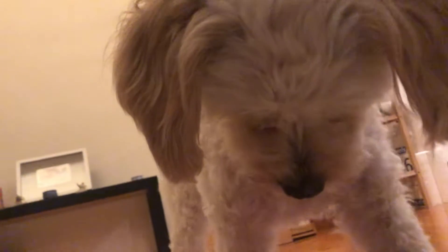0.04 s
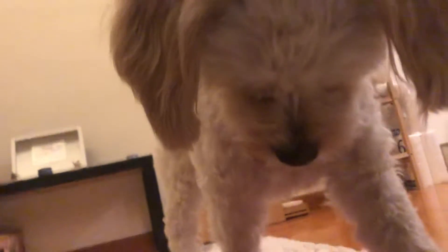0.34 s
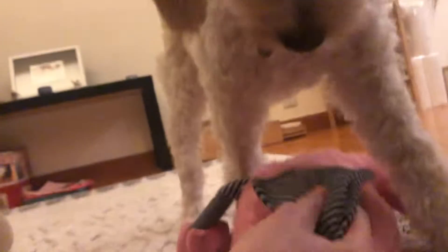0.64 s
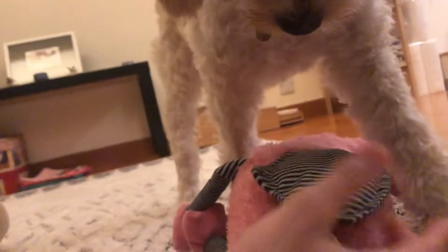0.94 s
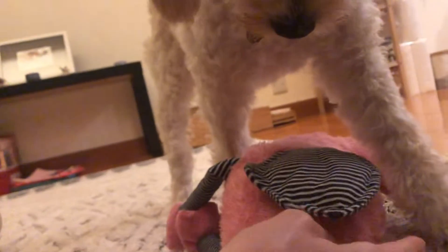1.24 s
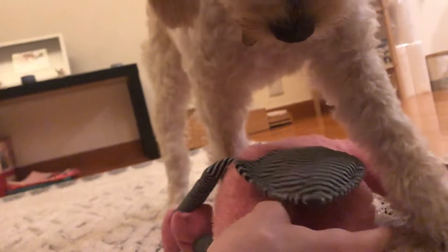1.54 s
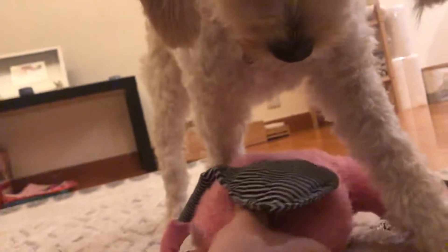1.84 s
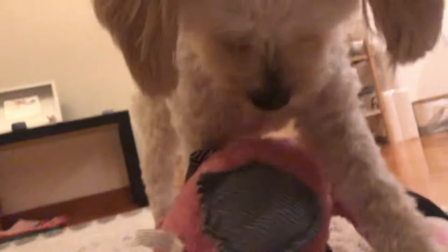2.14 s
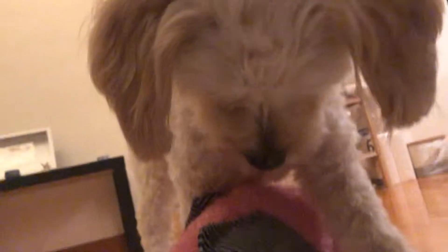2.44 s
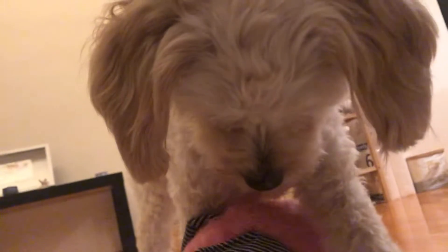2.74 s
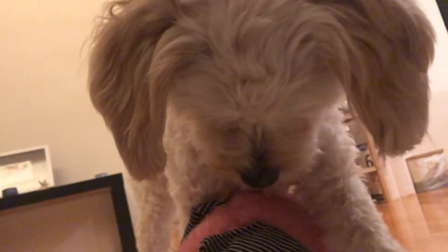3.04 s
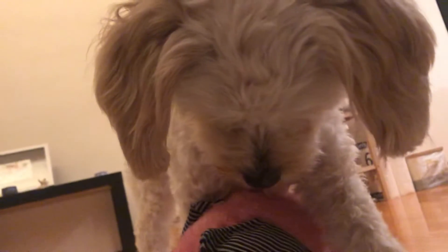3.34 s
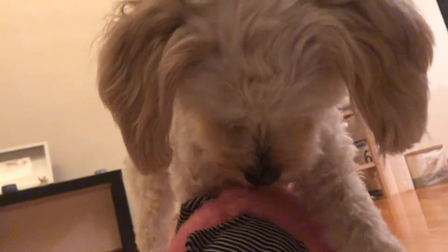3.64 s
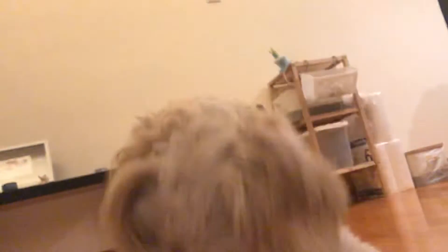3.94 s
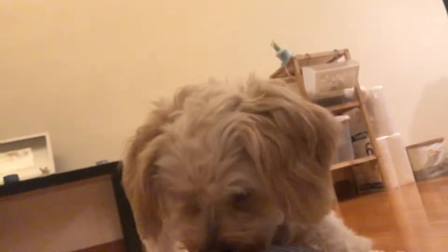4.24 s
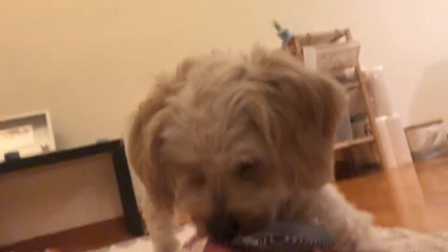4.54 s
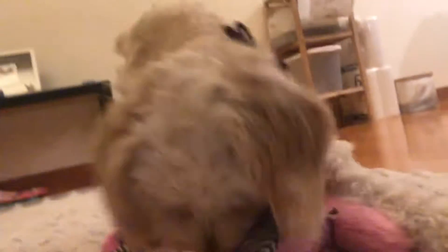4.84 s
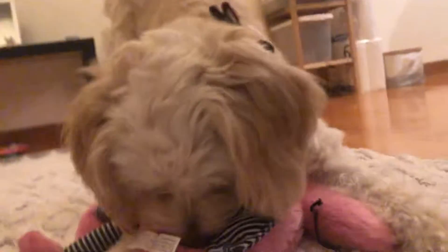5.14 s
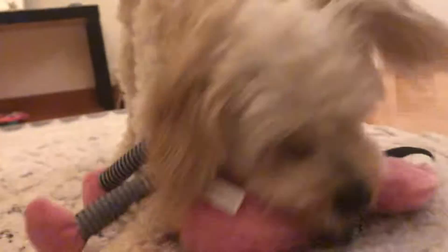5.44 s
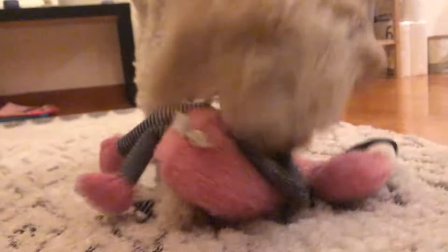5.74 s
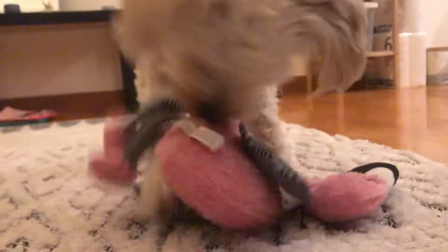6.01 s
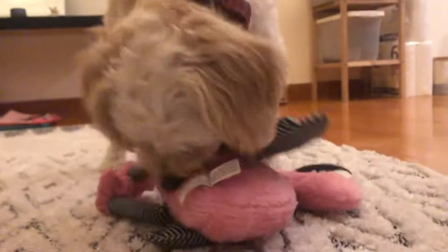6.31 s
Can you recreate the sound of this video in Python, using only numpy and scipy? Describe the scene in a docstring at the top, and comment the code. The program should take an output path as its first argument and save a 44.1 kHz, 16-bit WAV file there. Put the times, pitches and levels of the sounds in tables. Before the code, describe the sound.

A dog noses and bites a plush toy, giving three short high squeaks amid close cloth rustling, crackles and dull thumps.

```python
"""A plush toy's reed squeaks three times as a dog noses and bites it on a rug, close to the microphone.
The reed chops air into pulses that ring a short pipe: bite, refill, bite; later a leak whistles faintly.
The cloth crackles and rustles, the toy bumps on the rug, and the dog sniffs once.
Farther off, friction strokes scuff and drum the wooden floor and fill the live room."""
import sys
import numpy as np
from scipy import signal
from scipy.fft import rfft, irfft
from scipy.io import wavfile
from scipy.ndimage import uniform_filter1d

SR = 44100
rng = np.random.default_rng(int(sys.argv[2]) if len(sys.argv) > 2 else 0)


def int16_out(signal):
    """Quantize to a 16-bit WAV file."""
    q = np.round(np.clip(np.atleast_2d(signal).T, -1, 1) * 32767)
    wavfile.write(sys.argv[1], SR, q.astype(np.int16))


N = 285326
TIME = np.arange(N) / SR

# rubs of fur and plush: start_s, length_s, level_db, snap_peak_db
RUB_STROKES = [(0, .1, -56, -26), (.1, .085, -50, -24), (.27, .03, -44, -29), (.428, .055, -45, -22),
               (.52, .05, -55, -27), (.57, .11, -48, -26), (.7, .09, -50, -29), (.82, .06, -59, -29),
               (3.655, .04, -63, -52), (3.8, .18, -40.5, -33), (3.98, .07, -52, -40),
               (5.345, .07, -48.5, -36), (5.46, .05, -58, -37), (5.545, .14, -46.5, -32),
               (5.69, .08, -44, -30), (5.78, .07, -53, -31), (5.85, .18, -54, -40), (6.03, .11, -50, -30),
               (6.17, .03, -42, -29), (6.22, .23, -62, -44)]


def amp(db):
    """Decibels to gain."""
    return 10 ** (np.asarray(db) / 20)


def unit(x):
    """Scale to rms 1."""
    return x / np.sqrt(np.mean(x ** 2) + 1e-20)


def read(points, hz):
    """Curve value at hz, interpolated in log frequency."""
    freq_hz, value = np.transpose(points)
    return np.interp(np.log(hz + 1), np.log(freq_hz), value)


def add(mix, start_s, sound):
    """Mix a sound in at start_s."""
    part = mix[max(round(start_s * SR), 0):][:len(sound)]
    part += sound[:len(part)]


def coloured(x, spectrum, tilt_db_per_oct=0):
    """Filter by a spectrum tilted about 500 Hz; rms 1."""
    hz = np.fft.rfftfreq(len(x), 1 / SR)
    gain_db = read(spectrum, hz) + tilt_db_per_oct * np.log2(hz / 500 + .1)
    return unit(irfft(rfft(x) * amp(gain_db), len(x)))


def minimum_phase(gain_db):
    """Sharpest causal impulse response with this spectrum."""
    cepstrum = irfft(np.log(amp(gain_db)))
    half = len(cepstrum) // 2
    cepstrum[1:half] *= 2
    cepstrum[half + 1:] = 0
    return irfft(np.exp(rfft(cepstrum)))


def drift(samples, window):
    """Noise smoothed twice over window samples; rms 1."""
    return unit(uniform_filter1d(uniform_filter1d(rng.standard_normal(samples), window), window))


def strokes(rows, attack_s, release_s):
    """Envelope of strokes that swell, hold and die away."""
    gain = np.zeros(N)
    for start_s, length_s, level_db, *_ in rows:
        rise = np.clip((TIME - start_s) / attack_s, 0, 1)
        fall = np.exp(-np.maximum(TIME - start_s - length_s, 0) / release_s)
        gain = np.maximum(gain, amp(level_db) * rise * fall)
    return gain


def ring(peak_db, hz, decay_s):
    """One mode swells and dies."""
    t = TIME[:SR]
    return amp(peak_db) * t / decay_s * np.exp(1 - t / decay_s) * np.sin(2 * np.pi * hz * t)


def room_tone(rms_db=-59):
    """Faint, steady noise of the still room."""
    # noise spectrum: freq_hz, gain_db
    spectrum = [(12, -35), (20, -5.5), (152, -6.5), (208, -6), (239, -15.5), (308, -6.5), (397, -18),
                (498, -18), (739, -21), (953, -20), (2480, -29.5), (15100, -40), (16900, -66)]
    return amp(rms_db) * coloured(rng.standard_normal(N), spectrum)


def room(x, gap_s=0.0043):
    """Dense reflections; the treble dies first."""
    # reverberation time: freq_hz, t60_s
    decay = [(100, 0.72), (400, 0.68), (1100, 0.53), (4000, 0.51), (8000, 0.39), (15000, 0.33)]
    taps = rng.standard_normal(SR) * np.clip(TIME[:SR] / gap_s - 1, 0, 1)
    hz, t, bands = signal.stft(taps, SR, nperseg=256)
    tail = signal.istft(bands * amp(-60 * t / read(decay, hz)[:, None]), SR, nperseg=256)[1]
    return signal.fftconvolve(x, tail / np.linalg.norm(tail))[:N]


def floor_drum(force):
    """The floor's modes ring on after the driving force."""
    # floor modes: freq_hz, width_hz, level_db
    modes = [(112, 6.4, -3), (207.2, 11, -5), (275, 16, -9), (319.1, 12, 0.5), (357, 24, 1), (456.4, 22, 2),
             (488, 14, -11.5)]
    t = TIME[:SR // 2]
    response = sum(amp(db) * np.sqrt(width_hz) * np.exp(-np.pi * width_hz * t)
                   * np.sin(2 * np.pi * hz * t) for hz, width_hz, db in modes)
    return signal.fftconvolve(force, response / np.linalg.norm(response))[:len(force)]


def scuffs(uneven_db=2.0, direct_db=-3, room_db=-3, drum_db=-2):
    """Distant friction strokes with their echo; each has its own brightness, and heavier ones drum."""
    # scuffs: start_s, level_db, rise_s, hold_s, fade_s, tilt_db_per_oct, heavy_db
    rows = [(0.632, -41.5, 0.072, 0.013, 0.058, -0.5, -3.5), (1.865, -36.5, 0.006, 0.018, 0.028, 0.7, 6),
            (2.278, -31.5, 0.012, 0.015, 0.047, -1.03, -2.5), (2.554, -35, 0.005, 0.0096, 0.035, -0.76, 1),
            (2.688, -36.5, 0.044, 0.021, 0.066, -0.6, -1.5), (3.058, -36, 0.1, 0.069, 0.045, -1.1, 2),
            (4.25, -43, 0.0068, 0.013, 0.038, -0.5, -0.5), (4.31, -31.5, 0.047, 0.12, 0.068, 0.6, -12.5),
            (4.628, -39.5, 0.013, 0.035, 0.063, -0.7, -9), (4.928, -48.5, 0.013, 0.013, 0.15, -1, -4.5)]
    # friction spectrum: freq_hz, gain_db
    spectrum = [(40, -42), (85, -14), (130, -1), (250, -1), (320, -9), (460, -2), (600, -12), (880, -5),
                (1400, -6.5), (2000, -11.5), (3600, -14), (6000, -24.5), (10000, -35), (16000, -60)]
    hiss, shove, t = np.zeros(N), np.zeros(N), TIME[:SR]
    for start_s, level_db, rise_s, hold_s, fade_s, tilt_db_per_oct, heavy_db in rows:
        rise = np.minimum(t / rise_s, 1) ** 2
        fall = np.exp(-np.maximum(t - rise_s - hold_s, 0) / fade_s)
        grip = amp(uneven_db * drift(SR, window=250))  # catches and slips
        push = amp(level_db) * rise * fall * grip
        add(hiss, start_s, push * coloured(rng.standard_normal(SR), spectrum, tilt_db_per_oct))
        add(shove, start_s, push * amp(heavy_db) * rng.standard_normal(SR))
    direct = hiss + amp(drum_db) * floor_drum(shove)
    return amp(direct_db) * direct + amp(room_db) * room(direct)


def sniff(start_s=5.04, length_s=.22, level_db=-51):
    """Air drawn through a nose pressed into plush: a rush with one hollow resonance."""
    # breath spectrum: freq_hz, gain_db
    spectrum = [(200, -25), (550, -14), (1000, -12), (1550, -11), (1750, 0), (2000, -11), (2600, -22),
                (8000, -34)]
    breath = strokes([(start_s, length_s, level_db)], attack_s=.15, release_s=.08)
    return breath * coloured(rng.standard_normal(N), spectrum)


def bumps(rumble_db=-3):
    """Dull rumble of the shifting toy, low booms and one hard tap."""
    # pushes on the toy: start_s, length_s, level_db
    pushes = [(.015, .13, -46.5), (.25, .15, -54), (.415, .06, -37), (.52, .17, -42.5), (.68, .17, -33),
              (.86, .14, -39), (1.72, .05, -51), (3.845, .11, -38.5), (4.03, .1, -51), (4.8, .27, -52),
              (5.68, .04, -56), (5.89, .04, -51), (6.03, .2, -55)]
    # rumble spectrum: freq_hz, gain_db
    spectrum = [(25, -36), (45, -22), (80, -1), (130, 2), (170, -3.5), (260, -4.5), (360, -12), (550, -26),
                (1200, -35), (4000, -54)]
    # floor and room modes: start_s, peak_db, freq_hz, decay_s
    booms = [(0.426, -31, 127.6, 0.021), (.5, -39.5, 125.5, 0.062), (0.734, -36.5, 81, 0.045),
             (.815, -33.5, 79.2, .045), (1.03, -43.5, 124.7, .07), (3.16, -37, 109, .032),
             (4.38, -39, 146, .05), (4.51, -37, 130, .03)]
    handling = amp(rumble_db) * strokes(pushes, attack_s=.022, release_s=.075)
    out = handling * coloured(rng.standard_normal(N), spectrum)
    for start_s, peak_db, hz, decay_s in booms:
        add(out, start_s, ring(peak_db, hz, decay_s))
    add(out, .1781, ring(peak_db=-26.5, hz=2070, decay_s=.0011))  # tap
    return out


def pats(fall=1.45, lowest_hz=65, blur_rad=0.75):
    """Soft blows: treble arrives first, bass trails; the rug's pile blurs the sweep."""
    # pats on the rug: start_s, peak_db, start_hz, rise_s
    blows = [(3.846, -29, 136, 0.017), (5.703, -35, 1800, 0.0028), (5.741, -32.5, 1790, 0.0024),
             (5.904, -36, 1054, 0.0046), (5.91, -36, 264, 0.0065), (6.065, -34, 1780, 0.00216),
             (6.116, -37, 780, 0.0041), (6.139, -39, 990, 0.0029), (6.157, -40, 130, 0.011),
             (6.177, -36, 2200, 0.0065)]
    out, t = np.zeros(N), TIME[:SR // 4]
    for start_s, peak_db, start_hz, rise_s in blows:
        age = t / rise_s
        pitch_hz = lowest_hz + (start_hz - lowest_hz) / (1 + fall * age)
        phase = 2 * np.pi * np.cumsum(pitch_hz) / SR
        phase += blur_rad * drift(len(t), window=round(SR / start_hz))
        add(out, start_s, amp(peak_db) * age * np.exp(1 - age) * np.sin(phase))
    return out


def rustle(grains_per_s=700, spread_db=7.5, hiss_gain=.9, clump_db=2, gain_db=-1):
    """Fibres slip in clumps of uneven grains over a brushing hiss."""
    # plush spectrum: freq_hz, gain_db
    spectrum = [(150, -8.5), (500, 3), (900, 8.5), (1800, 4.5), (3000, 3), (6000, 0.5), (10000, -0.5),
                (13000, -10), (16000, -21.5)]
    sizes = amp(spread_db * np.minimum(rng.exponential(1, N), 4)) * rng.choice([-1, 1], N)
    grains = unit(sizes * (rng.random(N) < grains_per_s / SR))
    rubbing = (grains + hiss_gain * rng.standard_normal(N)) * amp(clump_db * drift(N, window=150))
    envelope = amp(gain_db) * strokes(RUB_STROKES, attack_s=.014, release_s=.018)
    return envelope * coloured(rubbing, spectrum)


def thread_slips(slips_per_s=58, centre_hz=4500, spread_db=2.5, spread_oct=.5):
    """Threads catch and let go unevenly during each rub. Rows: start_s, peak_db, centre_hz."""
    rows = []
    for start_s, length_s, _, peak_db in RUB_STROKES:
        slips_s = (np.arange(32) + rng.random(32)) / slips_per_s
        force, pitch = np.clip(rng.standard_normal((2, 32)), -2, 2)
        slip_hz = centre_hz * 2 ** (spread_oct * pitch)
        crackle = np.c_[start_s + slips_s, peak_db + spread_db * force, slip_hz]
        rows += list(crackle[slips_s < length_s])
    return rows


def snaps(skirt_db_per_oct=8, grit=0.33, decay_cycles=2.15, min_decay_s=0.00031):
    """A sharp release, then a brief scatter of fibres; dull snaps last longer."""
    # loud snaps of cloth, claws and teeth: start_s, peak_db, centre_hz
    loud = [(0.0347, -22, 3900), (0.0527, -16.5, 5300), (0.107, -17, 9800), (0.1144, -12.5, 6100),
            (0.125, -18, 8900), (0.1472, -9, 9000), (0.1605, -10, 4940), (0.1782, -14, 2250),
            (0.267, -20, 6500), (0.279, -18, 6800), (0.2993, -20, 8900), (0.3164, -18.5, 3530),
            (0.4364, -17, 4500), (0.4399, -21, 2970), (0.4686, -20.5, 4280), (0.5891, -21, 2800),
            (0.6544, -19.5, 3900), (0.7478, -15, 8700), (0.7838, -22.5, 2600), (0.7905, -20, 3800),
            (0.8822, -19, 6350), (1.059, -33.5, 3730), (1.6989, -18, 8100), (2.0074, -16.5, 4800),
            (2.1366, -31, 5700), (3.8146, -22.5, 6700), (3.9511, -19, 7500), (3.9986, -23.5, 3250),
            (4.0567, -27, 4650), (4.2077, -37, 3600), (4.28, -33.5, 4700), (4.31, -25.5, 4900),
            (4.654, -26, 4100), (4.7455, -16, 5600), (4.7863, -20.5, 5200), (4.8246, -22.5, 4160),
            (5.5348, -21.5, 5340), (5.5623, -14.5, 5100), (5.7058, -19.5, 4800), (5.7368, -21.5, 7250),
            (5.8505, -25, 7900), (6.0785, -22, 7600), (6.1312, -22.5, 4500), (6.177, -25, 6100),
            (6.2164, -23, 9600), (6.4136, -31, 7100)]
    # snap spectrum: freq_hz, gain_db
    spectrum = [(100, -18.5), (500, 9.5), (1000, 7), (2100, 8.5), (3100, 1.5), (4700, 2.5), (8000, 1),
                (12000, 1), (16000, -13)]
    out, t, hz = np.zeros(N), TIME[:512], np.fft.rfftfreq(512, 1 / SR)
    for start_s, peak_db, centre_hz in list(loud) + thread_slips():
        decay_s = min_decay_s + decay_cycles / centre_hz
        force = grit * rng.standard_normal(len(t)) * np.exp(-t / decay_s)
        force[0] = 1  # release
        octaves = np.log2((hz + 100) / centre_hz)
        skirt_db = skirt_db_per_oct * (np.sqrt(1 + octaves ** 2) - 1)
        snap = signal.fftconvolve(force, minimum_phase(read(spectrum, hz) - skirt_db))
        add(out, start_s, amp(peak_db) * snap / abs(snap).max())
    return out


def whistle(waver=.002):
    """Too little air to swing the reed: a thin tone with two stray overtones."""
    # leak through the reed: time_s, pitch_hz, level_db
    leak = [(5.855, 7700, -68), (5.87, 7600, -55), (5.89, 7600, -63), (5.905, 7560, -43),
            (5.922, 7580, -49), (5.94, 7550, -55), (5.96, 7450, -72)]
    # whistle partials: pitch_ratio, level_db
    partials = [(1, 0), (1.647, -17), (1.808, -17)]
    time_s, pitch_hz, level_db = np.transpose(leak)
    cycles = np.cumsum(np.interp(TIME, time_s, pitch_hz) * (1 + waver * drift(N, window=80))) / SR
    tone = unit(sum(amp(db) * np.sin(2 * np.pi * ratio * cycles) for ratio, db in partials))
    gain = amp(np.interp(TIME, time_s, level_db, left=-np.inf, right=-np.inf))
    return uniform_filter1d(gain, size=400) * tone


def squeak(curve, pipe, jitter, air_db, slack_db_per_db=0.55, release_s=.005):
    """A reed chops air into pulses that ring a short pipe. Returns start_s, sound."""
    time_s, hz, db = np.transpose(curve)
    t = np.arange(time_s[0], time_s[-1], 1 / SR)
    level_db = np.interp(t, time_s, db)
    # a weakly blown reed is less steady
    flutter = jitter * amp(slack_db_per_db * np.minimum(db.max() - level_db, 20))
    pitch_hz = np.interp(t, time_s, hz) * (1 + flutter * drift(len(t), window=40))
    phase = 2 * np.pi * np.cumsum(pitch_hz) / SR
    grid_hz = np.fft.rfftfreq(2048, 1 / SR)
    pipe_phase = np.unwrap(np.angle(rfft(minimum_phase(read(pipe, grid_hz)))))
    tone = np.zeros(len(t))
    for k in range(1, 15):
        shift = np.interp(k * pitch_hz, grid_hz, pipe_phase)
        tone -= amp(read(pipe, k * pitch_hz)) * np.cos(k * phase + shift)
    air = coloured(rng.standard_normal(len(t)) * (1 + np.cos(phase)), pipe)
    closing = np.minimum((time_s[-1] - t) / release_s, 1)
    return time_s[0], closing * amp(level_db) * (unit(tone) + amp(air_db) * air)


def squeaker():
    """Two bites, the bulb drawing air just before the second; then the leak."""
    # reed curves: time_s, pitch_hz, level_db
    first_bite = [(2.873, 1060, -50), (2.8755, 1078, -20), (2.884, 1077, -19.5), (2.898, 1042, -20),
                  (2.9031, 975, -26.5), (2.9091, 875, -33), (2.9151, 815, -49)]
    refill = [(3.688, 1192, -69), (3.698, 1204, -32), (3.704, 1163, -23.5), (3.714, 1188, -25.5),
              (3.723, 1160, -24.5), (3.735, 1178, -29.5), (3.749, 1230, -22.5), (3.76, 1207, -26),
              (3.769, 1205, -32)]
    second_bite = [(3.847, 1010, -37), (3.851, 1046, -20), (3.865, 1072, -20), (3.88, 1139, -18),
                   (3.885, 1066, -25), (3.895, 1049, -17.5), (3.906, 1018, -31.5), (3.915, 1018, -26.5),
                   (3.923, 933, -27)]
    # pipe response when pressed, drawing air, wrapped in the jaws: freq_hz, gain_db
    pipe_pressed = [(800, 2), (1070, 1), (2150, 0), (3200, -3), (4300, -6), (5300, -25), (6400, -15.5),
                    (7450, -3.5), (8450, 2), (9500, -12.5), (10700, -9.5), (11700, -19), (12700, -26.5),
                    (15000, -31.5)]
    pipe_drawing = [(1190, -11.5), (2380, -8), (3570, -11), (4750, -14.5), (5950, -13.5), (7150, -3),
                    (8300, -14.5), (9500, -15), (10700, -27), (12000, -27), (14000, -54), (16000, -63)]
    pipe_in_jaws = [(1070, -1.5), (2150, -9), (3200, -14.5), (4300, -17.5), (5400, -29.5), (6500, -19),
                    (7450, -2.5), (8450, -6), (9600, -17), (10700, -19), (11800, -17), (13000, -30),
                    (16000, -44)]
    out = whistle()
    add(out, *squeak(first_bite, pipe_pressed, jitter=0.004, air_db=-28.5))
    add(out, *squeak(refill, pipe_drawing, jitter=0.0022, air_db=-23))
    add(out, *squeak(second_bite, pipe_in_jaws, jitter=0.0047, air_db=-21))
    return out


def scene(reed_room_db=-14, cloth_room_db=-15):
    """Near toy and dog, far scuffs and room tone; mono."""
    reed = squeaker()
    cloth = snaps() + rustle() + pats()
    echo = room(amp(reed_room_db) * reed + amp(cloth_room_db) * cloth)
    return (room_tone() + bumps() + sniff() + scuffs() + echo + cloth + reed)[None]


def record(dry, low_cut_hz=47, band_limit_hz=16650):
    """Microphone low cut and recorder band limit."""
    highpass = signal.butter(5, low_cut_hz, "highpass", fs=SR, output="sos")
    lowpass = signal.firwin(255, band_limit_hz, window=("kaiser", 9), fs=SR)
    return signal.oaconvolve(signal.sosfilt(highpass, dry), lowpass[None], "same")


dry = scene()
out = record(dry)
int16_out(out)
```